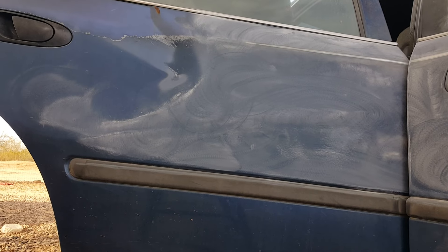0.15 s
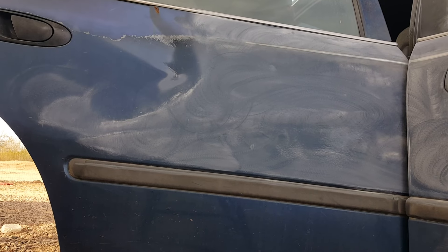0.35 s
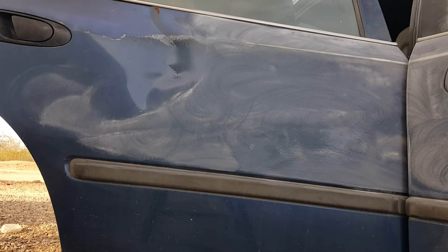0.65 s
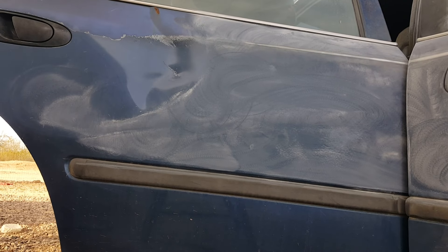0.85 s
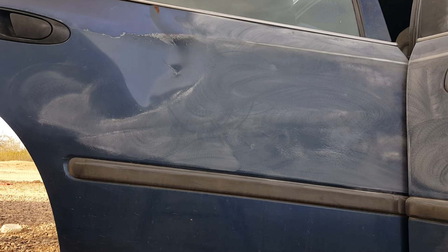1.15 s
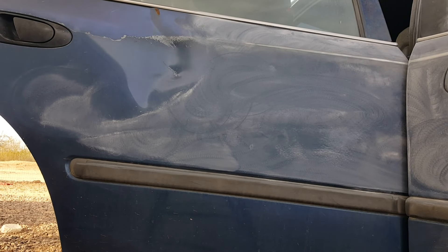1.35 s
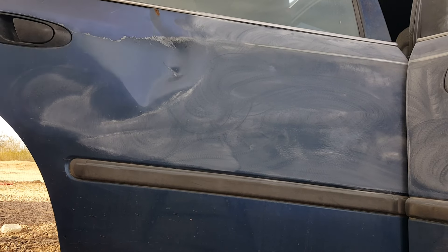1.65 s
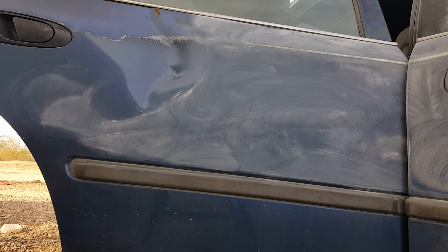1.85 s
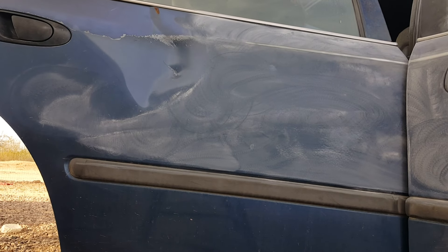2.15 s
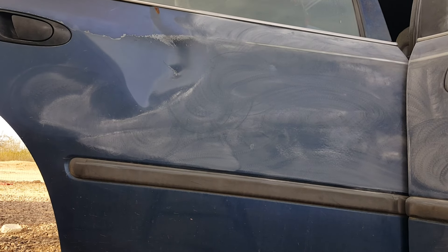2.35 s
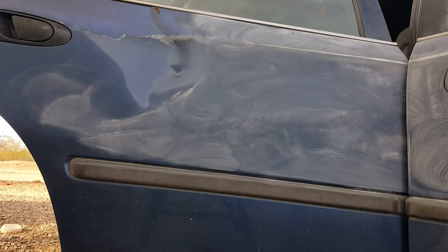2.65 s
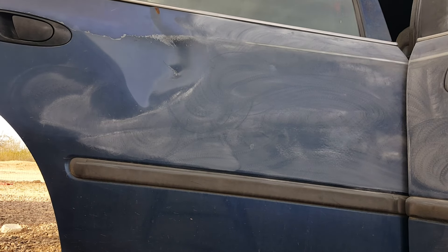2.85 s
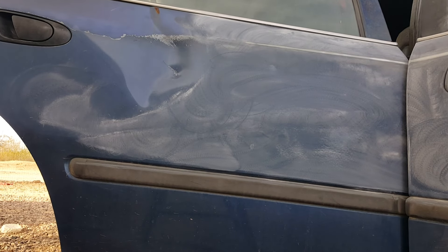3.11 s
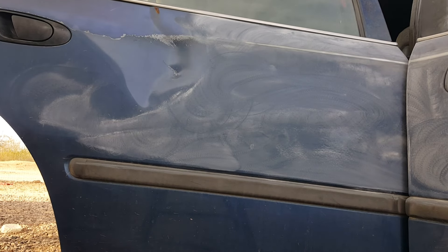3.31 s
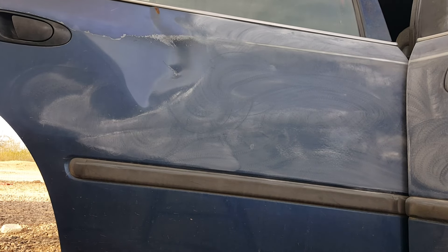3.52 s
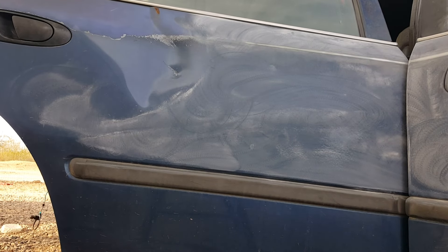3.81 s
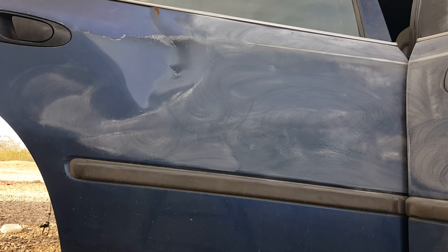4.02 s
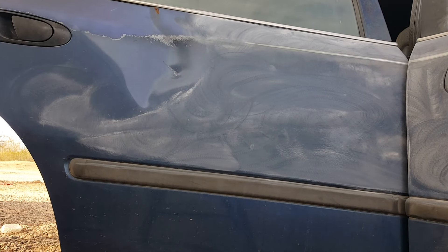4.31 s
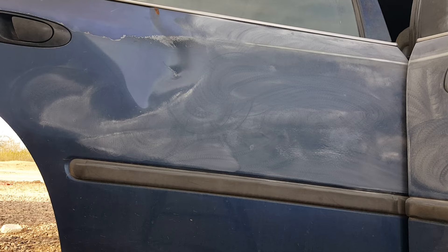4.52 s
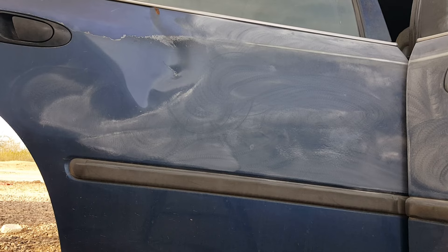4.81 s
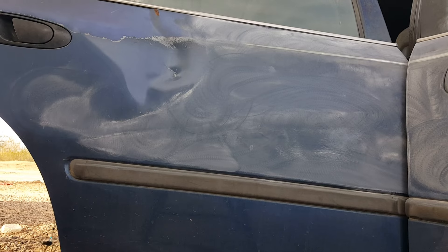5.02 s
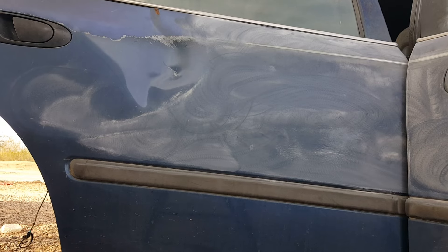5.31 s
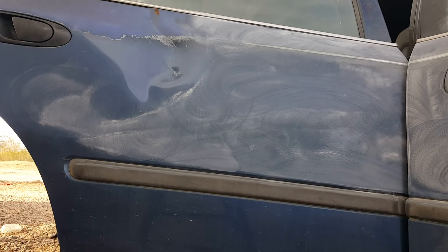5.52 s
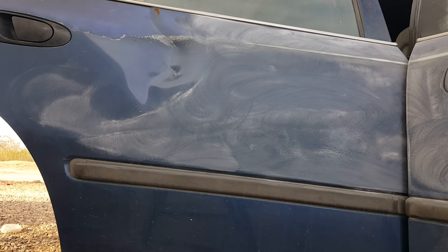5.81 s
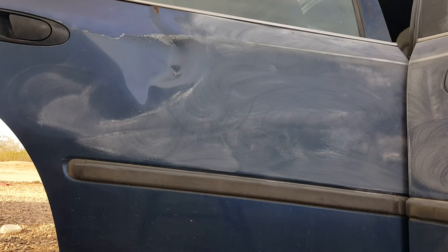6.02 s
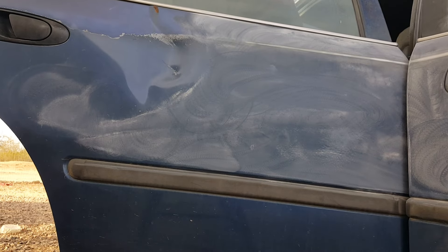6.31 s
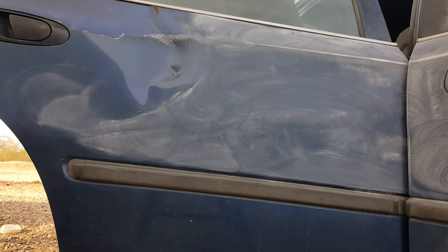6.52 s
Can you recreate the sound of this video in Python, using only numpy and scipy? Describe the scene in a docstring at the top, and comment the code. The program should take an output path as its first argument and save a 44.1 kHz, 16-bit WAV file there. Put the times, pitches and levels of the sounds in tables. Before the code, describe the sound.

Close outside a car door, in quiet open air, a hammer strikes the thin steel from behind. Four loud hollow booms with rattly clang come about half a second apart, then nearly three seconds of faint gritty scuffs, tool knocks, soft thuds and tiny squeaks. Four more heavy blows follow, some with a bright snap of the dent giving way. Each rings under a second. Stereo, slightly left.

```python
"""Hammering out a door dent

Outdoors, a dent is hammered out of a car door from behind, with the microphone close to the outer skin.
Each blow sums low bending modes (boom), a slow hum, higher modes (ring) and coloured noise (clang and buzz).
Resonant noise bursts knock, thud and tick between blows; short bright snaps follow closely on some blows.
Shaped noise rubs, scrapes, rumbles and scuffs on grit; wavering sines squeak. Quiet outdoor air lies behind.
"""
import sys
import numpy as np
from scipy import signal
from scipy.fft import rfft, irfft, next_fast_len
from scipy.io import wavfile

SR = 44100
rng = np.random.default_rng(int(sys.argv[2]) if len(sys.argv) > 2 else 0)


def inscribe(sig):
    """Save sig as 16-bit PCM at rate SR to the path in sys.argv[1].

    A 1-D sig is mono; a 2-D sig holds one channel per row.
    Samples are clipped to [-1, 1] before scaling.
    """
    pcm = np.round(np.clip(np.atleast_2d(sig).T, -1, 1) * 32767)
    wavfile.write(sys.argv[1], SR, pcm.astype(np.int16))


N = 293706
HIT_N = 44100  # samples in one blow
TIME = np.arange(N) / SR
AGE = np.arange(HIT_N) / SR

# Hammer blows. Each row: start in seconds, relative boom level in dB, relative clang and ring level in dB,
# treble tilt in dB, buzz length in seconds, boom ring time as a ratio, boom pitch as a ratio,
# lean to the left in dB before scaling, relative drone level in dB, rebound knock in dB, rebound tick in dB.
BLOWS = [(-.005, -3.5, 1.5, -8, 0.029, 1.45, 0.99, 2.5, 2.5, -46.5, -49.5),
         (0.5503, 0.5, 4, -5, 0.038, 1.1, .95, 1, -3, -46, -58.5),
         (1.1226, 2.5, -2, 1, 0.052, 0.99, 0.94, 2, -8, -37, -56),
         (1.6991, 0, -0.5, -3, 0.036, 0.66, 0.96, 2.5, -17, -56.5, -72),
         (4.5981, 2.5, 0, -4.5, 0.026, 0.42, 1.17, 1, -4, -45.5, -72),
         (5.0675, 1, -1.5, -0.5, 0.048, 1.09, .99, -0.5, -14, -51, -74),
         (5.547, 2, 1.5, -2, .051, 1.09, 0.97, -0.3, -8.5, -63, -77),
         (6.255, 3, 1, -3.5, .065, 1.22, 0.97, -0.5, -10.5, -60, -78)]
# Bending modes of the whole skin. Each row: pitch in Hz and ring time (t60) in seconds, both before
# the blow's ratios, with the relative level in dB between them.
BOOM_MODES = [(68.5, -29.5, 0.35), (109, -20, 0.33), (122.4, -15.5, 0.36), (223, -27.5, 0.41),
              (237.5, -24, 0.074)]
# Colour of a knocked door part. Each row: frequency in Hz, relative density in dB per Hz.
KNOCK_COLOUR = [(150, 3.5), (400, 5), (800, 0), (1200, 2), (1600, -9.5), (2400, -11), (4000, -23),
                (8000, -39)]
# Colour of the bright contact tick. Each row: frequency in Hz, relative density in dB per Hz.
TICK_COLOUR = [(800, -1.5), (2500, 9), (5000, -3), (8000, 0), (10000, -12), (12500, -9), (15500, -1.5)]
# Colour of rubbing inside the door. Each row: frequency in Hz, relative density in dB per Hz.
RUB_COLOUR = [(200, 4), (450, -3.5), (700, -3.5), (1200, -7), (1600, 0), (2000, -2), (3000, -6.5),
              (4500, -11.5), (8000, -32)]
# How hard the arm rubs about inside the door. Each row: time in seconds, base level in dB.
EFFORT = [(0, -84), (2.1, -88), (2.8, -72.5), (3.25, -80), (4.2, -75.5), (4.7, -66.5), (5.5, -64.5),
          (5.8, -68), (6.15, -60), (6.66, -62.5)]


def undb(db):
    """Decibels to gain."""
    return 10 ** (np.asarray(db) / 20)


def on_log(table, hz):
    """Read (Hz, value) points along a log-frequency axis."""
    f, v = np.transpose(table)
    return np.interp(np.log(np.maximum(hz, 1)), np.log(f), v)


def fade(age, t60):
    """Exponential ring-down, 60 dB in t60 seconds."""
    return np.exp(-np.log(1000) * np.maximum(age, 0) / np.maximum(t60, .005))


def swell(s, half_s):
    """A smooth rise and fall around time s, top 1."""
    return np.exp(-((TIME - s) / half_s) ** 2)


def walk(rate, size):
    """Smooth random wandering, spread near 1, with rate new values a second."""
    steps = np.arange(size) / SR * rate
    return np.interp(steps, np.arange(4096), rng.standard_normal(4096))


def pan(db):
    """Gains of the two channels, left minus right in dB."""
    return undb(np.array([[db], [-db]]) / 2)


def noise(spectrum, size, peak_hz=1000, peak_gain=0, peak_q=11):
    """Stereo noise of unit rms and given colour, with an optional resonance; the bass is nearly alike in both ports."""
    # Noise of each port's own. Each row: frequency in Hz, share of the power that differs (0 to 1).
    diffuse = [(100, 0.07), (250, 0.03), (500, 0.16), (1000, 0.3), (3000, 0.91), (10000, 0.94)]
    hz = np.arange(size // 2 + 1) * SR / size
    shared, left, right = rfft(rng.standard_normal((3, size)))
    own = np.clip(on_log(diffuse, hz), 0, 1)
    both = np.sqrt(1 - own) * shared + np.sqrt(own) * np.array([left, right])
    # roll off beyond both ends of the colour table
    top = 1 / (1 + (hz / spectrum[-1][0] / 1.3) ** 4)
    bottom = hz ** 2 / (hz ** 2 + (spectrum[0][0] / 2) ** 2)
    resonance = peak_gain / (1 + (2 * peak_q * (hz / peak_hz - 1)) ** 2)
    x = irfft(both * top * bottom * (undb(on_log(spectrum, hz)) + resonance), size)
    return x / x.std()


def add(out, s, x):
    """Mix a sound in at time s."""
    start = int(round(s * SR))
    lo, hi = max(start, 0), min(start + x.shape[-1], N)
    out[:, lo:hi] += x[..., lo - start:hi - start]


def hammer(clang_level_db=-25, ring_level_db=-1, boom_level_db=0, boom_pan=0.76, clang_pan=0.96):
    """Every blow excites the boom, drone, ring and clang of the same door, then the hammer rebounds."""
    out = np.zeros((2, N))
    for s, boom_db, clang_db, treble_db, buzz_s, ring, pitch, pan_db, drone_db, rebound_db, tick_db in BLOWS:
        low = undb(boom_db + boom_level_db) * boom(ring, pitch) + undb(drone_db) * drone()
        metal = undb(clang_level_db) * clang(buzz_s, treble_db) * chatter(pitch)
        metal = metal + undb(ring_level_db) * sheet_ring(buzz_s)
        add(out, s, low * pan(boom_pan * pan_db))
        add(out, s, undb(clang_db) * metal * pan(clang_pan * pan_db))
        rebound(out, s, rebound_db, tick_db)
    return out


def boom(ring, pitch, contact_s=0.0021, stretch=0.015, relax_s=0.028, yield_s=0.00223):
    """The skin gives way just after contact and swings outward; stretched steel starts slightly sharp."""
    age = np.maximum(AGE - yield_s, 0)
    clock = age + stretch * relax_s * (1 - np.exp(-age / relax_s))
    modes = 0
    for hz, db, t60 in BOOM_MODES:
        modes = modes + undb(db) * np.cos(2 * np.pi * hz * pitch * clock) * fade(age, t60 * ring)
    return modes * (1 - np.exp(-AGE / contact_s))


def clang(buzz_s, treble_db, spread_s=0.0034, rough_db=2.0, tail_db=-33, tail_t60=1.0, crack_db=3, crack_s=0.014):
    """Crowded modes, fed while the skin buzzes against its fittings, then dying at a rate set for each band."""
    # Colour of the crowded sheet modes. Each row: frequency in Hz, relative density in dB per Hz.
    clang_colour = [(50, -9.5), (100, 7.5), (190, 3), (290, 1.5), (470, 0.5), (800, -6), (1250, -4),
                    (1500, -10), (2400, -12.5), (3500, -25.5), (4100, -24), (8000, -35), (10000, -45.5),
                    (15500, -41)]
    # Damping of the crowded modes by band. Each row: centre in Hz, ring time (t60) in seconds.
    damping = [(60, 0.58), (250, 0.25), (1000, 0.22), (2500, 0.2), (6000, 0.17), (15000, 0.35)]
    spectrum = rfft(noise(clang_colour, HIT_N))
    hz = np.arange(spectrum.shape[1]) * SR / HIT_N
    out = 0
    for k, (centre, t60) in enumerate(damping):
        # overlapping bands that sum to 1
        weight = on_log([(f, j == k) for j, (f, _) in enumerate(damping)], hz)
        high = centre / (centre + 2500)
        # the treble cracks at contact, the middle swells
        attack = 1 - (1 - high) * np.exp(-AGE / spread_s) + high * undb(crack_db) * np.exp(-AGE / crack_s)
        decay = fade(AGE - buzz_s, t60) + (1 - high) * undb(tail_db) * fade(AGE, tail_t60)
        out = out + irfft(spectrum * weight, HIT_N) * attack * decay * undb(high * treble_db)
    return out * undb(rough_db * walk(350, HIT_N))


def chatter(pitch, depth_db=2.0, t60=0.87):
    """The skin slaps its fittings at both ends of each swing, less as the swing dies."""
    slaps = np.cos(2 * np.pi * (2 * BOOM_MODES[1][0] * pitch * AGE + rng.random()))
    return undb(depth_db * slaps * fade(AGE, t60))


def sheet_ring(buzz_s, spread_s=0.0076, scatter_db=1.0, fed=0.85, port_turns=0.12):
    """Higher modes build up as waves cross the sheet; their mix varies at random from blow to blow."""
    # Higher modes of the sheet. Each row: nominal pitch in Hz, mean relative level in dB,
    # ring time (t60) in seconds before the damping limit.
    ring_modes = [(145.7, -31, 0.23), (173.4, -29, 0.47), (196.5, -25.5, 0.21), (223.7, -26, 0.17),
                  (232.5, -26.5, 0.2), (333.9, -33, 0.28), (347, -32.5, 0.27), (441, -31.5, 0.47),
                  (448.6, -32.5, 0.28), (483.7, -31.5, 0.067), (569, -38, 0.22), (587, -38.5, 0.4),
                  (618, -47, 0.38), (660, -48, 0.14), (730, -40, 0.26), (825.5, -43, 0.12),
                  (885, -49, 0.12), (988, -49, 0.22), (1113, -38.5, 0.18), (1187, -38.5, 0.36),
                  (1277, -47, 0.17), (1666, -46, 0.12), (1820, -40.5, 0.27), (1900, -44.5, 0.5),
                  (2460, -49, .2), (2570, -46.5, 0.15), (2950, -53, .22), (3076, -49.5, 0.38),
                  (3210, -60, 0.12)]
    out = 0
    for hz, db, t60 in ring_modes:
        size, detune, skew = rng.standard_normal(3)
        # short waves reach the two ports out of step
        phase = rng.random() + port_turns * skew * min(hz / 1000, 1) * np.array([[1], [-1]])
        wave = np.sin(2 * np.pi * (hz * (1 + 0.0045 * detune) * AGE + phase))
        # paint and sealant damp the highest modes most
        longest = .45 / (1 + hz / 2200)
        out = out + wave * undb(db + scatter_db * size) * fade(AGE - fed * buzz_s, min(t60, longest))
    return out * (1 - np.exp(-AGE / spread_s))


def drone(rise_s=0.018):
    """The shell takes up the blow slowly and hums on."""
    # Lightly damped shell modes. Each row: pitch in Hz, relative level in dB, ring time (t60) in seconds.
    shell_modes = [(170.2, -34.5, 0.98), (253, -34.5, 0.78)]
    modes = sum(undb(db) * np.sin(2 * np.pi * hz * AGE) * fade(AGE, t60) for hz, db, t60 in shell_modes)
    return modes * (1 - np.exp(-AGE / rise_s))


def rebound(out, s, knock_db, tick_db, fall_s=.146, bounce_s=.008, bounce_db=-1.5, frame_hz=880, t60=0.14):
    """The hammer falls back against the door's inner frame and bounces once."""
    for after_s, drop_db in ((0, 0), (bounce_s, bounce_db)):
        add(out, s + fall_s + after_s, undb(drop_db) * contact(knock_db, tick_db, frame_hz, t60))


def contact(knock_db, tick_db, hz, t60, tick_ratio=.75, rough_db=3, resonance_db=9, pan_db=1.5, tick_pan_db=6):
    """A short contact of steel on steel ticks and rings the part that it meets."""
    size = HIT_N // 3
    part = undb(knock_db) * noise(KNOCK_COLOUR, size, hz, undb(resonance_db))
    part = part * fade(AGE[:size], t60) * pan(pan_db)
    tick = undb(tick_db) * noise(TICK_COLOUR, size) * fade(AGE[:size], t60 * tick_ratio) * pan(tick_pan_db)
    return (part + tick) * undb(rough_db * walk(400, size))


def knocks(snap_t60=0.058):
    """Light knocks of the tool on parts inside the door, one short scrape as the arm draws back, and short
    snaps of the dent giving way."""
    # Tool knocks; the first row is a short scrape as the arm draws back after the first blow. Each row: start
    # in seconds, knock level in dB, tick level in dB, resonance in Hz, # ring time (t60) in seconds.
    tool_knocks = [(.351, -49, -51, 1907, 0.16), (.521, -42, -61, 430, 0.092),
                   (2.08, -58.5, -63.5, 2270, .022), (2.288, -41, -76, 1110, .055),
                   (2.38, -48.5, -64, 540, 0.24), (2.418, -47, -57.5, 1170, 0.11),
                   (2.527, -54, -65, 1150, .09), (2.856, -53.5, -86, 1700, 0.095),
                   (3.072, -51, -79, 1540, 0.095), (3.103, -49, -69, 1000, 0.12),
                   (3.604, -61, -81, 680, 0.11), (3.733, -70, -63, 430, 0.14), (3.988, -53, -74, 985, 0.21),
                   (4.128, -38, -62, 440, 0.18), (4.686, -36.5, -64, 436, 0.17),
                   (4.79, -50, -63, 880, 0.18), (4.885, -47, -78, 441, 0.21), (5.357, -48.5, -67, 440, .14),
                   (5.507, -51, -60, 1810, 0.24), (5.526, -40, -49.5, 910, 0.44),
                   (5.846, -46, -80, 1140, .085), (5.957, -47.5, -69, 880, 0.048)]
    # Snaps under a blow. Each row: start in seconds, knock level in dB, tick level in dB, resonance in Hz.
    dent_snaps = [(.557, -26, -41, 487), (.563, -22.5, -31, 2550), (1.708, -41, -35, 3930),
                  (6.273, -46, -37, 1200), (6.3, -28, -34, 2180)]
    out = np.zeros((2, N))
    for s, knock_db, tick_db, hz, t60 in tool_knocks:
        add(out, s, contact(knock_db, tick_db, hz, t60))
    for s, knock_db, tick_db, hz in dent_snaps:
        add(out, s, contact(knock_db, tick_db, hz, snap_t60))
    return out


def bumps(t60=0.42, rise_s=0.018, pan_db=3, frame_db=-18, frame_hz=436, frame_t60=0.22, resonance_db=10):
    """A soft push by the worker makes the skin thud and the frame behind it ring faintly."""
    # Pushes on the door. Each row: start in seconds, level in dB.
    pushes = [(0.519, -38), (3.01, -42.5), (3.606, -33.5), (3.68, -43.5), (4.083, -34.5), (4.129, -32),
              (4.383, -40.5), (5.36, -36.5), (6.069, -38)]
    # Colour of the thud. Each row: frequency in Hz, relative density in dB per Hz.
    thud_colour = [(25, -28.5), (70, -15), (130, 0.5), (200, -13), (400, -28), (1000, -43)]
    out, size = np.zeros((2, N)), HIT_N // 3
    age = AGE[:size]
    for s, db in pushes:
        thud = noise(thud_colour, size) * fade(age, t60) * (1 - np.exp(-age / rise_s))
        frame = undb(frame_db) * noise(KNOCK_COLOUR, size, frame_hz, undb(resonance_db)) * fade(age, frame_t60)
        add(out, s, undb(db) * (thud + frame) * pan(pan_db))
    return out


def scrapes(grain_db=3, edge_db=-6, pan_db=4, ring_hz=2100, ring_db=3):
    """The tool drags along the inside of the skin: grainy rubbing with a faint ring and a bright edge."""
    # Drags of the tool. Each row: loudest moment in seconds, level in dB, half length in seconds.
    drags = [(0.938, -58.5, .02), (1.507, -66, 0.034), (3.485, -70, 0.058), (4.034, -65.5, 0.07)]
    level = sum(undb(db) * swell(s, half_s) for s, db, half_s in drags)
    grind = noise(RUB_COLOUR, N, ring_hz, undb(ring_db)) + undb(edge_db) * noise(TICK_COLOUR, N)
    return level * undb(grain_db * walk(300, N)) * grind * pan(pan_db)


def squeaks(flutter_db=3):
    """Steel slides on steel and sings briefly on a wavering pitch."""
    # Squeaks. Each row: middle in seconds, half length in seconds, centre pitch in Hz, level in dB,
    # depth of the pitch wobble as a share.
    slides = [(4.348, 0.025, 2690, -65.5, 0.066), (4.425, 0.033, 2790, -61.5, .015),
              (4.45, 0.052, 2490, -66, .03), (4.53, 0.047, 2770, -66.5, .025), (4.55, .04, 4030, -71, .008),
              (4.78, .07, 3910, -70, .005), (4.99, .035, 2020, -52, 0.0062),
              (5.373, 0.052, 3100, -64, 0.069)]
    out = 0
    for s, half_s, hz, db, wobble in slides:
        waver = 1 + wobble * (.5 * walk(40, N) + walk(600, N))
        phase = 2 * np.pi * np.cumsum(hz * waver) / SR
        out = out + undb(db) * swell(s, half_s) * np.sin(phase)
    return out * undb(flutter_db * walk(70, N))


def catches(count=80, over_db=8, scatter_db=5, t60=0.055, resonance_db=12):
    """The rubbing tool catches now and then, each catch a tiny pitched tick."""
    out, size = np.zeros((2, N)), HIT_N // 6
    for when, pitch, strength in rng.random((count, 3)):
        s = when * N / SR
        db = np.interp(s, *np.transpose(EFFORT)) + over_db + scatter_db * (2 * strength - 1)
        tick = noise(KNOCK_COLOUR, size, 700 * 2 ** pitch, undb(resonance_db)) * fade(AGE[:size], t60)
        add(out, s, undb(db) * tick)
    return out


def arm(swing_lead_s=0.0097, swing_s=0.024, swing_db=12.5, rest_at_s=0.13, rest_s=.06, rest_db=-6,
        draw_at_s=.31, draw_s=0.094, draw_db=-10):
    """Gains of the arm's motions: steady rubbing that rests after each blow, the swing in and the draw back."""
    effort = undb(np.interp(TIME, *np.transpose(EFFORT)))
    times = [blow[0] for blow in BLOWS]
    rest = sum(swell(s + rest_at_s, rest_s) for s in times)
    swing = sum(swell(s - swing_lead_s, swing_s) for s in times)
    draw = sum(swell(s + draw_at_s, draw_s) for s in times)
    return effort * undb(rest_db * rest), effort * undb(swing_db) * swing, effort * undb(draw_db) * draw


def handling(catch_db=3.5, grain_db=0.1, steady_hiss_db=-13, swing_hiss_db=-10, draw_hiss_db=-2, sway_db=2.0, pan_db=3):
    """Tool and sleeve rub and hiss with the arm's motion; the door rumbles as it shifts under the worker's weight."""
    # Colour of the hiss. Each row: frequency in Hz, relative density in dB per Hz.
    hiss_colour = [(2000, -7), (5000, -10), (8200, 2), (10000, -17), (13000, -2.5), (15500, -12.5)]
    # Rumble of the shifting door. Each row: time in seconds, level in dB before the random sway.
    rumble_level = [(0, -50.5), (.5, -60.5), (1, -61), (2.3, -65.5), (3.1, -55.5), (3.5, -59.5),
                    (4.55, -48), (5.7, -47.5), (6, -56), (6.66, -56.5)]
    # Colour of the rumble. Each row: frequency in Hz, relative density in dB per Hz.
    rumble_colour = [(25, -16.5), (70, 1), (115, 2), (170, -6), (260, -20.5), (350, -8), (500, -22),
                     (1000, -31.5)]
    steady, swing, draw = arm()
    texture = undb(catch_db * walk(60, N) + grain_db * walk(500, N))
    rub = (steady + swing + draw) * texture * noise(RUB_COLOUR, N)
    hiss_gain = undb(steady_hiss_db) * steady + undb(swing_hiss_db) * swing + undb(draw_hiss_db) * draw
    hiss = hiss_gain * noise(hiss_colour, N)
    sway = sway_db * walk(12, N)
    rumble = undb(np.interp(TIME, *np.transpose(rumble_level)) + sway) * noise(rumble_colour, N)
    return (rub + hiss + rumble) * pan(pan_db)


def scuffs(grit_db=3.0, pan_db=3):
    """A sole drags over grit: a grainy swell."""
    # Shoe scuffs. Each row: loudest moment in seconds, level in dB, rise in seconds, fall in seconds.
    steps = [(2.19, -63.5, 0.046, 0.055), (2.276, -47, 0.042, 0.042), (2.621, -49, 0.061, 0.026),
             (2.719, -58.5, 0.059, 0.046)]
    # Colour of the grit. Each row: frequency in Hz, relative density in dB per Hz.
    grit_colour = [(100, 2), (400, -2), (1150, 3), (1600, -10.5), (2700, -15.5), (4000, -24.5),
                   (8000, -18.5), (10000, -27), (15000, -22.5)]
    level = 0
    for s, db, rise, fall in steps:
        level = level + undb(db) * np.exp(-((TIME - s) / np.where(TIME < s, rise, fall)) ** 2)
    return level * noise(grit_colour, N) * undb(grit_db * walk(300, N)) * pan(pan_db)


def air(level_db=-64.5):
    """Still outdoor air: steady noise, heaviest in the bass."""
    # Colour of the air. Each row: frequency in Hz, relative density in dB per Hz.
    air_colour = [(15, -18), (25, 3), (108, -3.5), (223, -15), (354, -15), (476, -26), (962, -23.5),
                  (1040, -28.5), (1890, -31.5), (4870, -41.5), (16000, -43.5)]
    return undb(level_db) * noise(air_colour, N)


def at_ports(door):
    """The dent lies a little to the left: the right port hears it late and, over most of the range, softer."""
    # Lead of the left port. Each row: frequency in Hz, phase in radians.
    port_phase = [(50, .03), (250, 0.24), (750, 0.49), (1750, 3.6), (2240, 3.2), (3530, 9.3), (8000, 9.9),
                  (16000, 19)]
    # Shading of the right port. Each row: frequency in Hz, left minus right in dB.
    port_shade = [(100, 0.2), (400, 1), (1500, 3), (4000, -1), (8000, 4), (16000, 6)]
    size = next_fast_len(N + HIT_N)
    hz = np.arange(size // 2 + 1) * SR / size
    lag = np.interp(hz, *np.transpose(port_phase))
    tilt = undb(on_log(port_shade, hz) / 2)
    ports = np.array([tilt, np.exp(-1j * lag) / tilt])
    return irfft(rfft(door, size) * ports, size)[:, :N]


def scene():
    """All the work at the door reaches the two ports, over the outdoor air."""
    door = hammer() + knocks() + bumps() + scrapes() + squeaks() + catches() + handling() + scuffs()
    return at_ports(door) + air()


def record(dry, drive=0.65, bass_hz=42, top_hz=15950):
    """The microphone sheds the deepest bass, rounds the loudest peaks and cuts the top."""
    thin = signal.sosfilt(signal.butter(2, bass_hz, "high", fs=SR, output="sos"), dry)
    rounded = np.tanh(drive * thin) / drive
    return signal.sosfilt(signal.ellip(8, .2, 70, top_hz, fs=SR, output="sos"), rounded)


dry = scene()
out = record(dry)
inscribe(out)
```